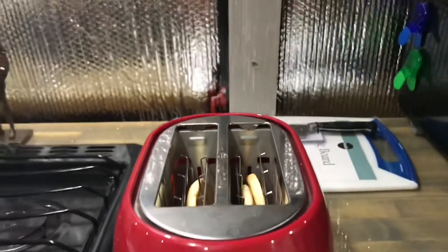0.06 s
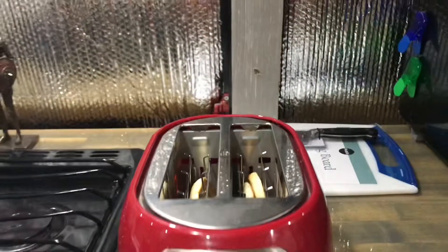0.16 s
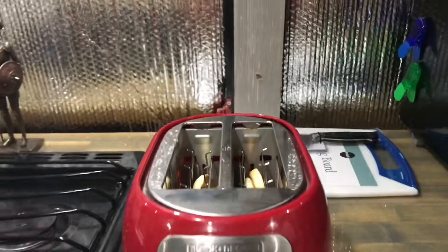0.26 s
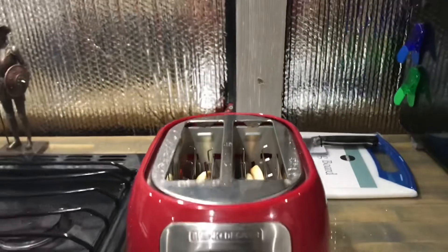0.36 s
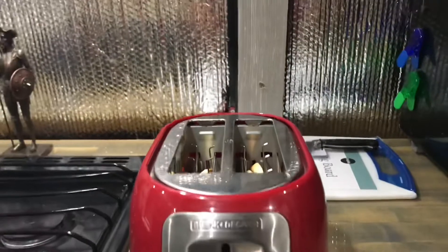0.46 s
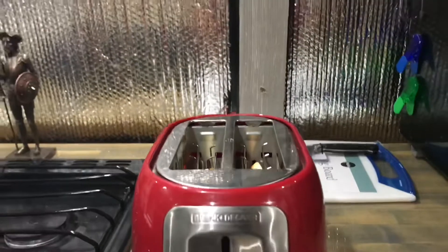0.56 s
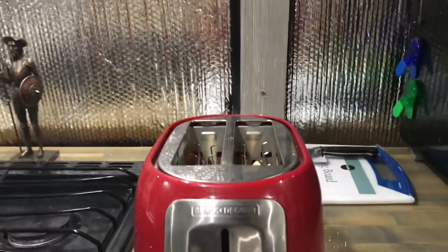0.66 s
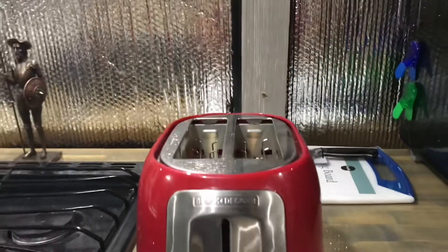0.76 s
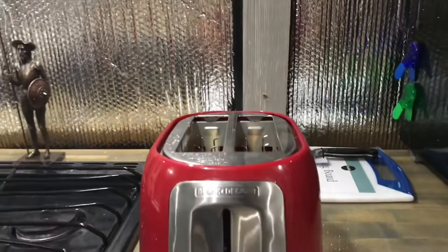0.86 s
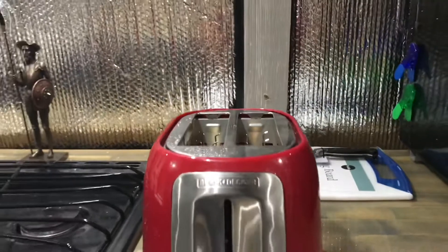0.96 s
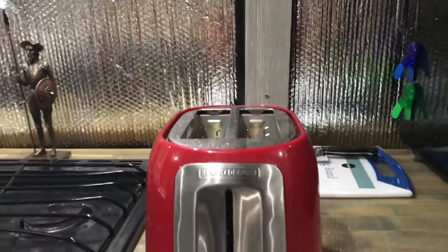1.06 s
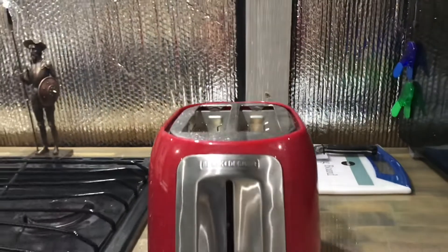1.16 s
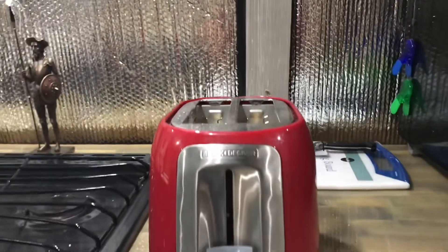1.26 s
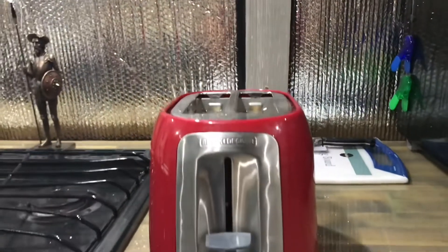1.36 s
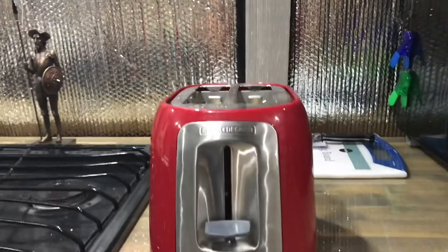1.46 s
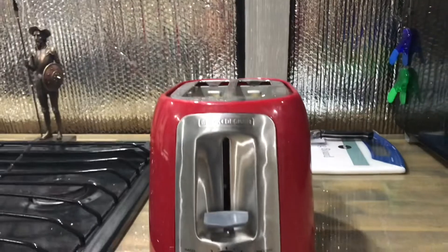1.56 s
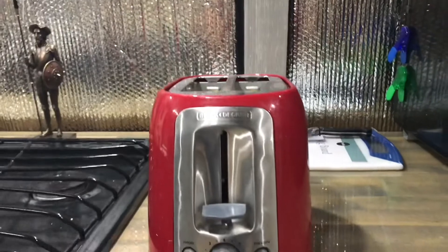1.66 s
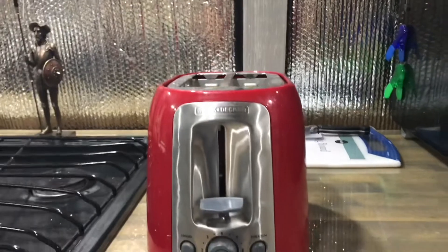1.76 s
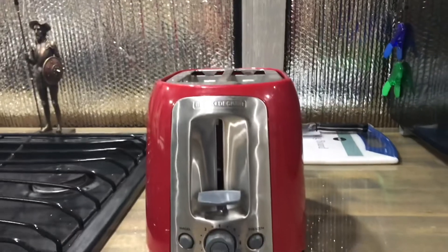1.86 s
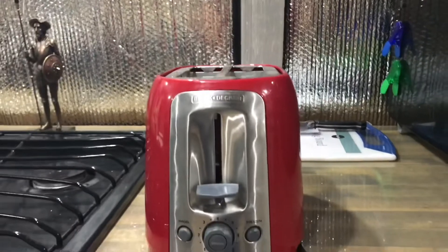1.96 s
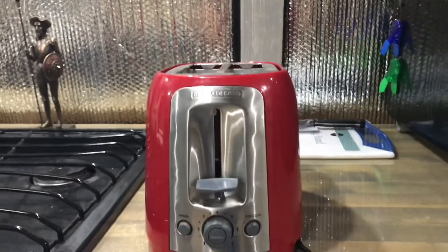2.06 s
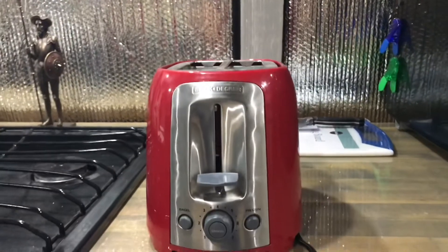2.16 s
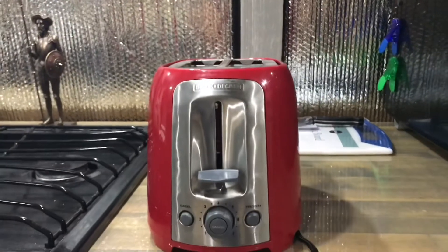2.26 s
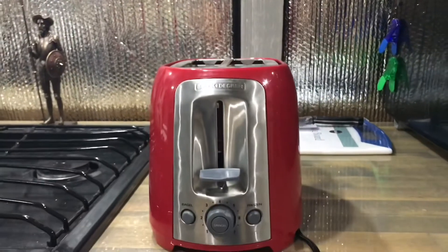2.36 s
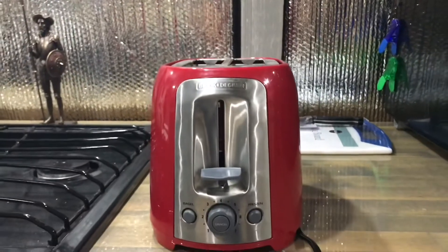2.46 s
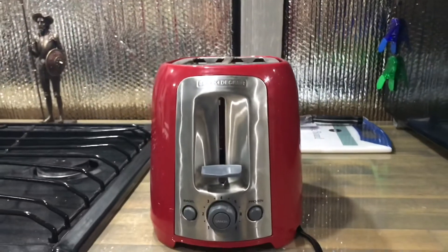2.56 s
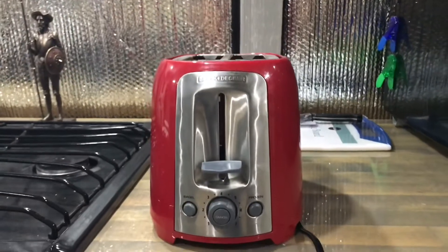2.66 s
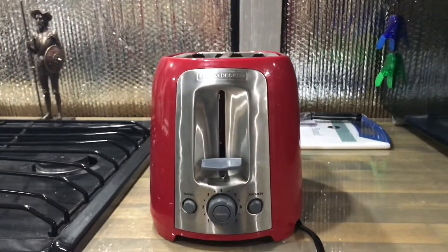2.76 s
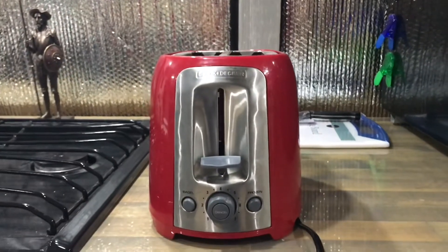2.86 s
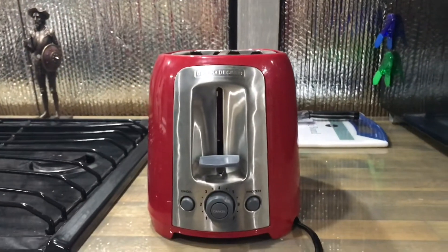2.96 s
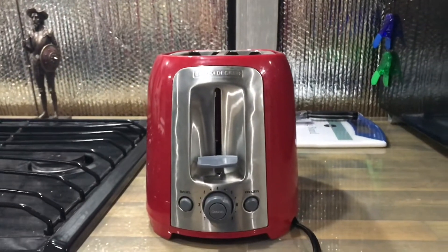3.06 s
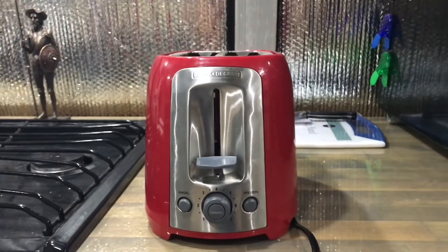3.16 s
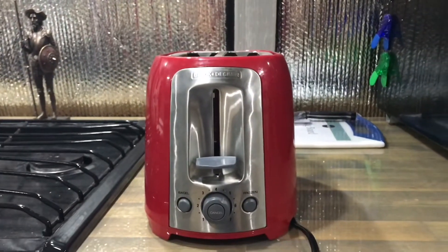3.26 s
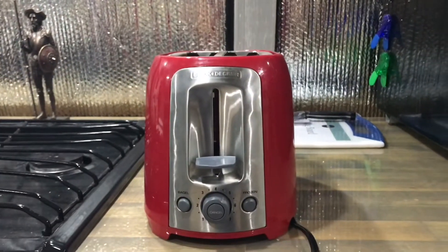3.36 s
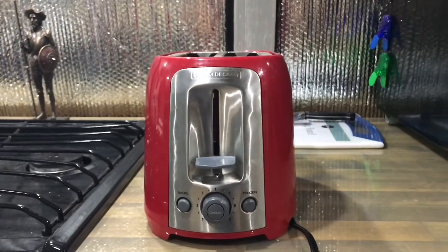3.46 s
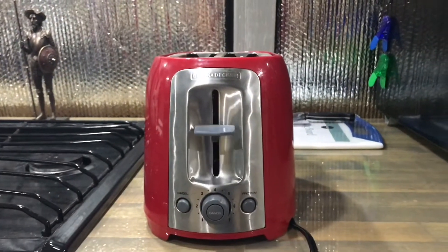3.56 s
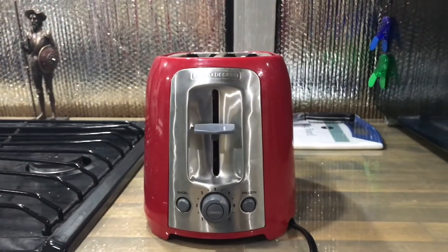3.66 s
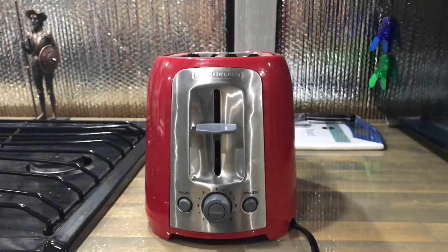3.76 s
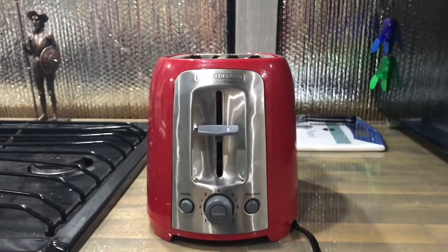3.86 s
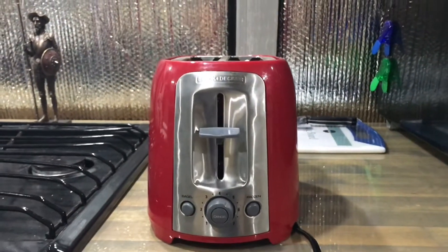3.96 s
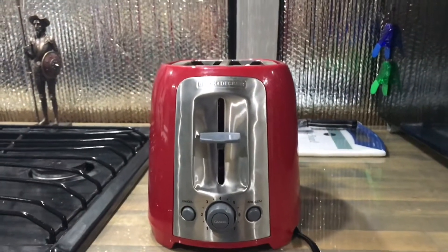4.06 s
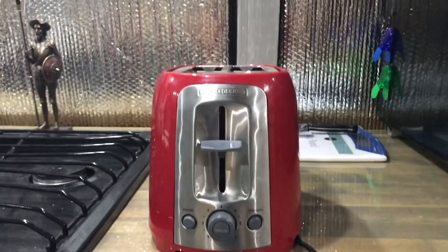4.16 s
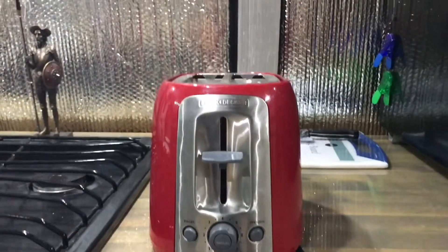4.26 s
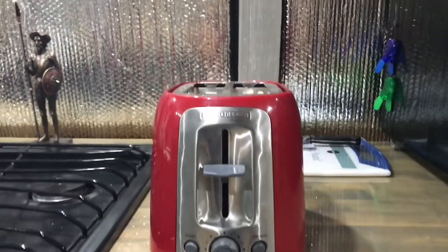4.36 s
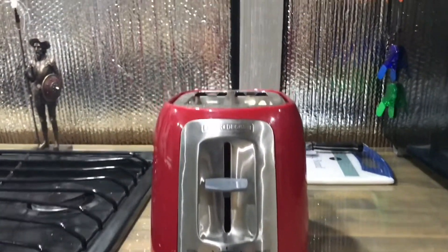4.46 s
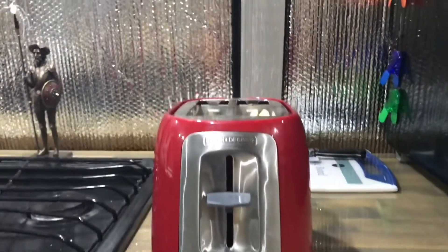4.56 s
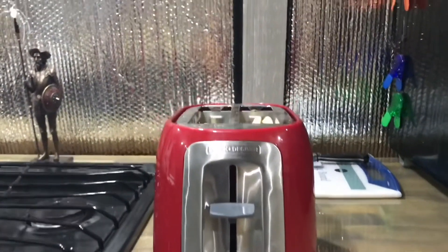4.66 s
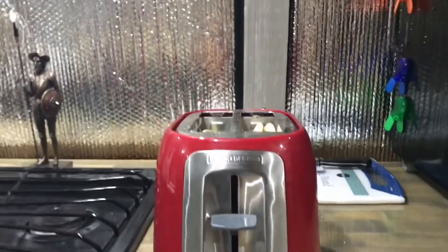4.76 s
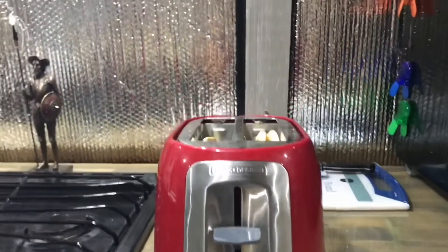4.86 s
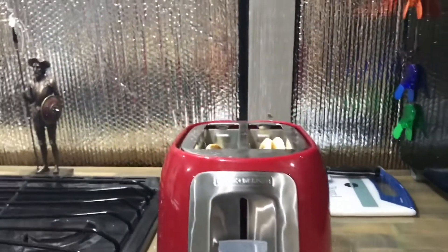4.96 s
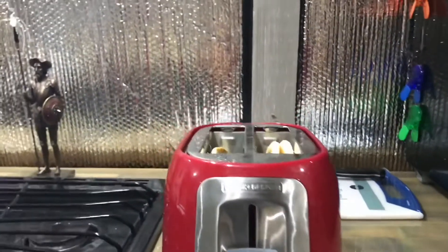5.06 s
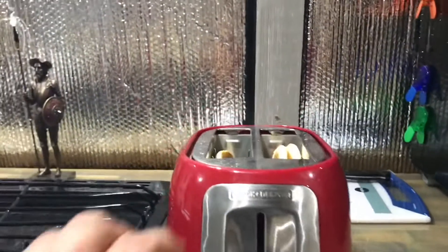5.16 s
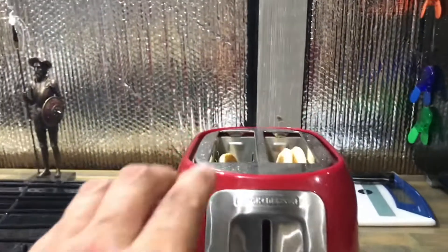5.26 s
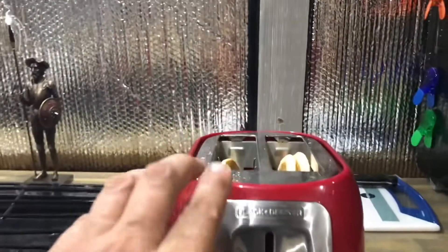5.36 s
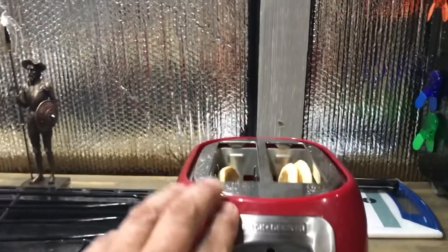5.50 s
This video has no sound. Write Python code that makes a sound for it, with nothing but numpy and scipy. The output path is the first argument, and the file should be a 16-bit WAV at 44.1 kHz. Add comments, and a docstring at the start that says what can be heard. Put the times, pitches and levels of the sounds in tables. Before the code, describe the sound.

A generator drones steadily outside a small camper kitchen, behind an airy rush. The drone drops a little as the microphone backs away from a toaster. Just past halfway, the toaster pops up with one loud, bright metallic clack and a brief spring rattle, and the generator runs slightly faster. A very faint tick follows, then a dry click as the microphone comes closer, and one last faint tick.

```python
"""A small camper kitchen, microphone close to a two-slot toaster. A generator drones outside, behind
the rush of the cabin; the microphone backs away, and at 1.7 s the drone steps down. At 3.4 s the latch
lets go and the sprung carriage slams into its stop and rattles, ducking the gain briefly. With the
heating wires off, the generator runs a little faster. A faint tick follows, then a dry click as the
microphone comes back in, and one last tick."""
import sys
import numpy as np
from scipy import signal
from scipy.fft import rfft, irfft, next_fast_len
from scipy.io import wavfile
from scipy.ndimage import uniform_filter1d, minimum_filter1d, map_coordinates

SR = 44100
rng = np.random.default_rng(int(sys.argv[2]) if len(sys.argv) > 2 else 0)


def store_pcm(level_fs):
    """Save levels as 16-bit WAV."""
    pcm = np.round(np.clip(level_fs, -1, 1) * 32767).astype(np.int16)
    wavfile.write(sys.argv[1], SR, np.atleast_2d(pcm).T)


N = 243873


def amp(db):
    """Decibels to gain."""
    return 10 ** (np.asarray(db) / 20)


def unit(x):
    """Scale to rms 1."""
    return x / np.sqrt(np.mean(x ** 2) + 1e-20)


def along(points, hz):
    """Read (frequency [Hz], value) points at hz, on a log frequency axis."""
    knots_hz, values = np.transpose(points)
    return np.interp(np.log(hz + 1), np.log(knots_hz + 1), values)


def wobble(knots_per_s):
    """A smooth random curve as long as the scene."""
    knots = rng.standard_normal(int(N * knots_per_s / SR) + 4)
    return map_coordinates(knots, [np.arange(N) * knots_per_s / SR])


def filtered(x, response):
    """Filter x by a gain given as a function of frequency."""
    size = next_fast_len(len(x) + 8192)
    return irfft(rfft(x, size) * response(np.fft.rfftfreq(size, 1 / SR)), size)[:len(x)]


def noise(spectrum, size=N):
    """Coloured noise of rms 1."""
    return unit(filtered(rng.standard_normal(size), lambda hz: amp(along(spectrum, hz))))


def fade(t, t60):
    """Exponential decay by 60 dB in t60 seconds."""
    return np.exp(-np.log(1000) * t / t60)


def ramp(start_s, length_s):
    """0 before start_s, rising evenly to 1 over length_s."""
    return np.clip((np.arange(N) / SR - start_s) / length_s, 0, 1)


def add(track, start_s, sound):
    """Mix a sound into a track at start_s."""
    part = track[round(start_s * SR):][:len(sound)]
    part += sound[:len(part)]


def generator(loaded_hz=54.42, free_hz=55.15, exhaust_db=-32.5, clatter_db=-57.5):
    """Outside: exhaust harmonics and clatter follow the firing rate, which rises as the load goes."""
    # exhaust note: (multiple of the firing rate, relative level loaded [dB], running free [dB])
    harmonics = [(1, 1, 1), (1.98, -25, -17), (2.97, -34, -41), (3.986, -12, -10.5), (5.01, -17.5, -22.5),
                 (6.006, -30.5, -17.5), (8.03, -25, -24.5), (11.18, -33, -39), (15.94, -27.5, -28),
                 (22.15, -36, -54)]
    # two high harmonics that depend on the microphone's place in the cabin:
    # (multiple, relative level at the toaster [dB], backed away [dB], change running free [dB])
    singing = [(23, -55, -22.5, 3), (24, -20.5, -31.5, -6)]
    # engine clatter: (frequency [Hz], relative density [dB])
    clatter_spectrum = [(150, 4), (350, 1), (700, 0.5), (1250, 0), (1600, -14), (2500, -17), (5000, -72)]
    free = ramp(3.39, 0.202)  # the heating wires switch off and the engine settles
    load = 1 - free
    before_step = 1 - ramp(1.66, 0.032)  # the drone steps down once
    away = ramp(0.95, 0.34) - ramp(4.45, 0.97)  # the microphone backs away and returns
    firing_hz = load * loaded_hz + free * free_hz
    phase = 2 * np.pi * np.cumsum(firing_hz) / SR + 0.0089 * wobble(11)
    exhaust = np.zeros(N)
    for multiple, loaded_db, free_db in harmonics:
        waver_db = np.log(multiple) * wobble(6.5)  # higher harmonics are less steady
        level_db = load * loaded_db + free * free_db + waver_db
        exhaust += amp(level_db) * np.sin(multiple * phase + rng.uniform(0, 2 * np.pi))
    for multiple, near_db, away_db, change_db in singing:
        level_db = (1 - away) * near_db + away * away_db + free * change_db + wobble(9)
        exhaust += amp(level_db) * np.sin(multiple * phase)
    clatter = unit(noise(clatter_spectrum) * (1 + 0.34 * np.cos(2 * phase)))  # swells twice a cycle
    exhaust *= amp(exhaust_db + 2 * before_step)
    clatter *= amp(clatter_db + 10.5 * before_step)
    return exhaust + clatter


def room_tone(rush_db=-47, rumble_db=-46):
    """All around the microphone: low wavering tones, a thin whine, rush and rumble."""
    # faint hum: (frequency [Hz], level [dB])
    hum_tones = [(73, -69.5), (89, -62), (119.5, -57), (355, -59)]
    # narrow, fan-like bands: (frequency [Hz], width [Hz], level [dB])
    whine_bands = [(1736, 70, -69.5), (2737, 30, -71.5), (3450, 90, -66), (4510, 90, -72.5),
                   (6150, 80, -75.5), (7100, 53, -83)]
    # rush in the cabin: (frequency [Hz], relative density [dB])
    rush_spectrum = [(240, -26), (420, -4.5), (620, 0.5), (780, -5.5), (1200, -3.5), (1550, -9),
                     (2600, -13.5), (3600, -14.5), (4900, -23), (6300, -22), (9300, -27), (10500, -31.5),
                     (14800, -26), (15700, -20)]
    # low rumble: (frequency [Hz], relative density [dB])
    rumble_spectrum = [(20, -29), (45, 3), (80, 8), (105, -2), (170, 2.5), (300, 3.5), (360, 3),
                       (410, -10.5), (700, -35.5)]
    t = np.arange(N) / SR
    hum, whine = np.zeros(N), np.zeros(N)
    for hz, db in hum_tones:
        hum += amp(db) * np.sqrt(2) * np.sin(2 * np.pi * hz * t + wobble(6))
    for hz, width_hz, db in whine_bands:
        phase = 2 * np.pi * hz * t
        whine += amp(db) * (wobble(width_hz) * np.sin(phase) + wobble(width_hz) * np.cos(phase))
    rush = amp(rush_db + 0.51 * wobble(8)) * noise(rush_spectrum)
    rumble = amp(rumble_db) * noise(rumble_spectrum)
    return hum + whine + rush + rumble


def toaster_pop(rebound_s=0.002, rebound_loss_db=4, wires_db=-18, rise_s=0.00038):
    """Close up: each blow and its rebound crack, knock the plastic housing and ring the steel."""
    # latch, carriage on its stop, housing, settling, toast landing:
    # (time [s], relative level of steel [dB], of crack [dB], of knock [dB])
    blows = [(3.3816, -31, -14.5, -28), (3.3874, -14, -12, -30), (3.3904, -25, -8.5, -14),
             (3.3970, -30, -22, -22), (3.4280, -46, -19, -41)]
    # steel frame modes: (frequency [Hz], width [Hz], relative level [dB])
    frame_modes = [(990, 65, -7), (1257, 60, -2), (1600, 88, -4), (3260, 150, 4), (4450, 71, -11),
                   (5090, 120, 0), (5670, 48, -2), (7260, 100, 3), (8090, 83, -4), (9500, 64, -1),
                   (9530, 110, 3.5), (10810, 270, 13), (11700, 32, -15), (15100, 170, -5)]
    # spring and guide wire modes: (frequency [Hz], relative level [dB], t60 [s])
    wire_modes = [(1685, -3, .22), (2385, -5, .26), (2823, 0, .28), (3209, -3, .22), (3330, -1, .2),
                  (4457, 2, .2), (5350, -2, .18), (6386, -5, .28), (7357, -3, .21), (9347, 3, .17),
                  (9814, 2, .14), (11090, -6, .22), (12008, -6, .26), (15130, -4, .2)]
    # crack of the impact: (frequency [Hz], relative density [dB])
    crack_spectrum = [(300, -19), (900, -12), (2100, -6.5), (3300, -2.5), (5500, 3.5), (6600, -6),
                      (8500, -2), (10700, 1.5), (13000, -5), (15500, -5.5)]
    # knock of the housing: (frequency [Hz], relative density [dB])
    knock_spectrum = [(150, -17), (400, -9), (560, -5.5), (720, -21), (950, -6.5), (1550, 0.5), (2050, -7),
                      (3300, -1.5), (6000, -9.5), (12000, -16.5)]
    out, t = np.zeros(N), np.arange(SR // 2) / SR
    for start_s, steel_db, crack_db, knock_db in blows:
        for bounce in range(2):
            frame, wires = np.zeros(len(t)), np.zeros(len(t))
            for hz, width_hz, db in frame_modes:
                decay = np.exp(-np.pi * width_hz * t)
                frame += amp(db + rng.normal(0, 1.3)) * decay * np.sin(2 * np.pi * hz * t)
            for hz, db, t60 in wire_modes:
                wires += amp(db + rng.normal(0, 2.2)) * fade(t, t60) * np.sin(2 * np.pi * hz * t)
            steel = amp(steel_db - 3.5) * (frame + amp(wires_db) * wires)
            crack = amp(crack_db) * fade(t, t60=0.021) * noise(crack_spectrum, len(t))
            knock = amp(knock_db) * fade(t, t60=0.04) * noise(knock_spectrum, len(t))
            contact = amp(-rebound_loss_db * bounce) * (1 - np.exp(-t / rise_s))
            add(out, start_s + rebound_s * bounce, contact * (steel + crack + knock))
    return out


def cabin_echo(x, build_s=0.0042):
    """Close foil-covered walls answer with a short, bright tail."""
    # decay of the cabin: (frequency [Hz], t60 [s])
    decay_times = [(200, 0.62), (1000, 0.28), (3000, 0.3), (8000, 0.22), (15000, 0.22)]
    hz, t, bands = signal.stft(rng.standard_normal(SR // 2), SR, nperseg=256)
    bands *= fade(t, along(decay_times, hz)[:, None])
    _, tail = signal.istft(bands, SR, nperseg=256)
    tail *= 1 - np.exp(-np.arange(len(tail)) / SR / build_s)
    return signal.fftconvolve(x, tail / np.linalg.norm(tail))[:N]


def spring_rattle(start_s=3.405, level_db=-29, rise_s=0.0059, contacts_per_s=1500):
    """Inside the toaster: the shaken spring and bread guides chatter in tiny contacts that die away."""
    # colour of the contacts: (frequency [Hz], relative density [dB])
    spectrum = [(400, 2), (1200, -1), (2800, 6), (4000, -10), (5500, 2), (8000, 0.5), (11500, -2),
                (13000, 2.5), (15300, -0.5)]
    out, t = np.zeros(N), np.arange(SR // 2) / SR
    contacts = (rng.random(len(t)) < contacts_per_s / SR) * rng.standard_normal(len(t))
    chatter = unit(filtered(contacts, lambda hz: amp(along(spectrum, hz))))
    envelope = (1 - np.exp(-t / rise_s)) * fade(t, t60=0.31)
    add(out, start_s, amp(level_db) * envelope * chatter)
    return out


def tick(hz, t60, grit=0.36):
    """A brief dying tone, made gritty by its wandering phase."""
    t = np.arange(SR // 10) / SR
    wander = grit * np.cumsum(rng.standard_normal(len(t)))
    return fade(t, t60) * np.sin(2 * np.pi * hz * t + wander)


def ticks_and_click(click_s=4.6309, click_db=-16.5, slips=4):
    """Two faint high ticks; between them a dry click whose slips come ever faster, louder and lower."""
    # faint ticks: (time [s], peak level [dB])
    faint_ticks = [(3.695, -49), (5.461, -47)]
    out = np.zeros(N)
    for start_s, db in faint_ticks:
        add(out, start_s, amp(db) * tick(hz=12700, t60=0.04))
    for k in range(slips):  # counted back from the last, strongest slip
        slip = amp(click_db - 7 * k) * tick(hz=1920 + 4000 * k, t60=0.0028)
        add(out, click_s - 0.00024 * k ** 2, slip)
    return out


def scene(pop_echo_db=-6):
    """At the microphone, in mono: the toaster close by, the cabin around it, the drone behind."""
    pop, chatter = toaster_pop(), spring_rattle()
    # the chatter leaves through the slots, toward the walls, so it feeds the echo in full
    echo = cabin_echo(amp(pop_echo_db) * pop + chatter)
    return (pop + chatter + echo + ticks_and_click() + generator() + room_tone())[None]


def gain_control(x, threshold_db=-22, slope=0.27, hold_s=0.14, ease_s=0.13):
    """Loud sound at the microphone turns the gain down; it holds, then eases back."""
    power = np.abs(uniform_filter1d(x ** 2, size=SR // 100))
    level_db = 10 * np.log10(power + 1e-12)
    cut_db = np.minimum(0, slope * (threshold_db - level_db))
    hold, ease = int(hold_s * SR), int(ease_s * SR)
    held_db = minimum_filter1d(cut_db, hold, origin=(hold - 1) // 2)
    eased_db = uniform_filter1d(held_db, ease, origin=(ease - 1) // 2)
    return x * amp(eased_db)


def record(dry, ceiling=0.94, top_hz=15750):
    """The microphone chain rides its gain, rounds the highest peaks and keeps nothing above top_hz."""
    ducked = gain_control(dry[0])
    rounded = ducked / (1 + (ducked / ceiling) ** 4) ** (1 / 4)
    return filtered(rounded, lambda hz: hz < top_hz)[None]


dry = scene()
out = record(dry)
store_pcm(out)
```